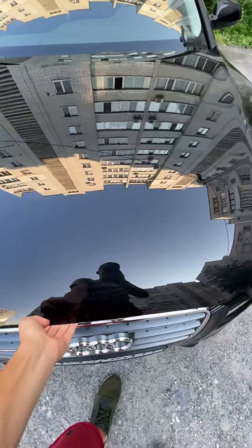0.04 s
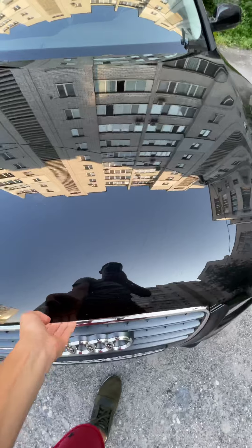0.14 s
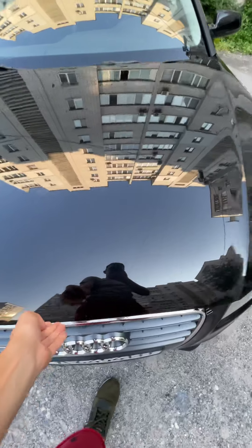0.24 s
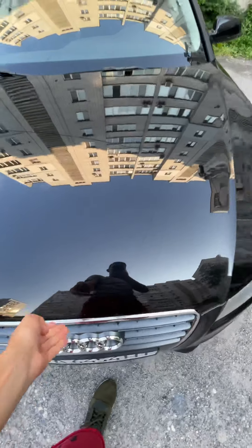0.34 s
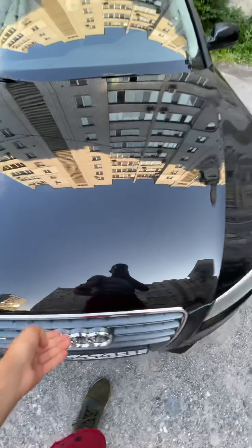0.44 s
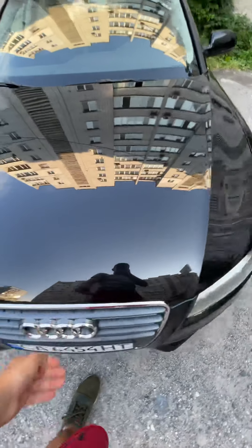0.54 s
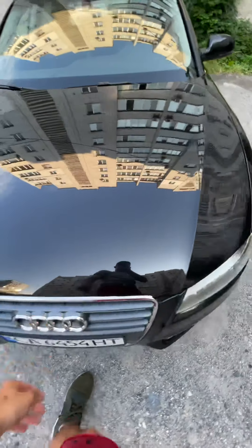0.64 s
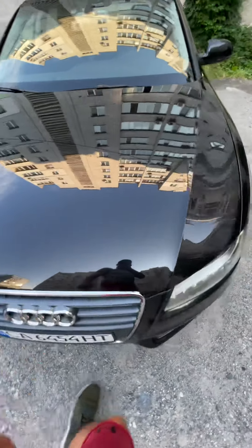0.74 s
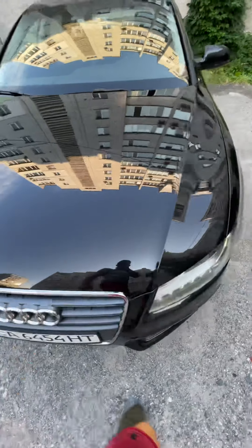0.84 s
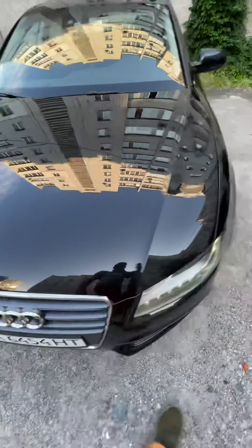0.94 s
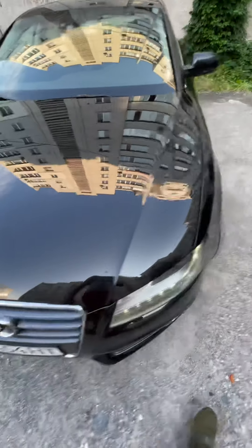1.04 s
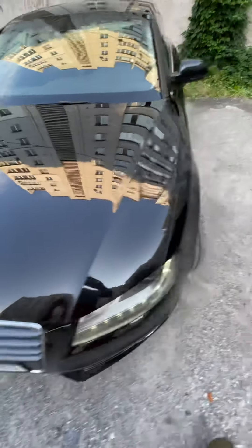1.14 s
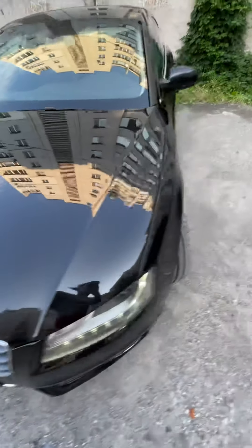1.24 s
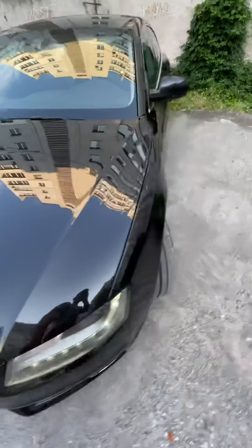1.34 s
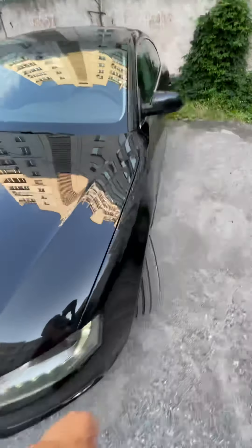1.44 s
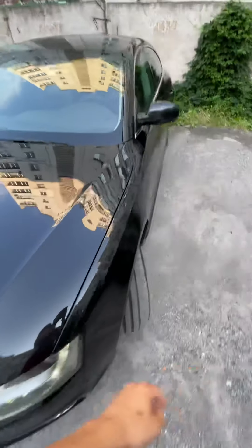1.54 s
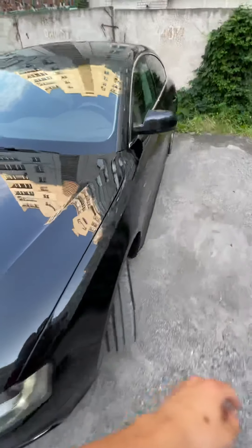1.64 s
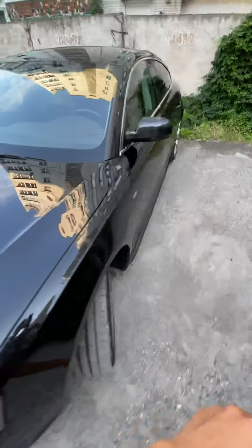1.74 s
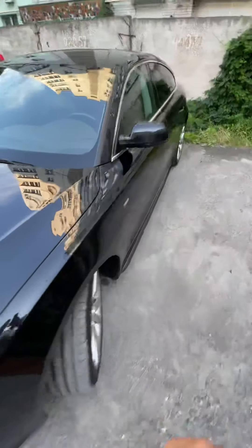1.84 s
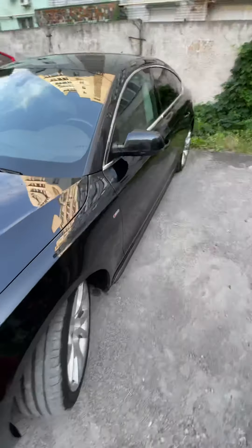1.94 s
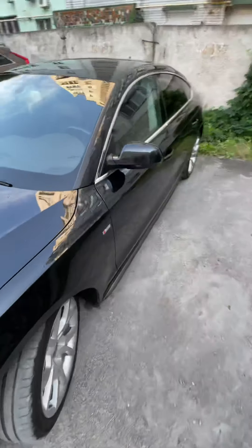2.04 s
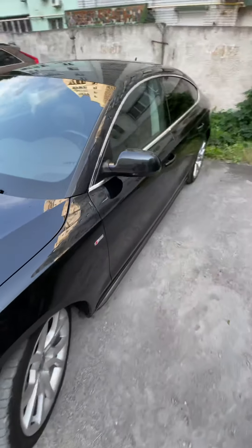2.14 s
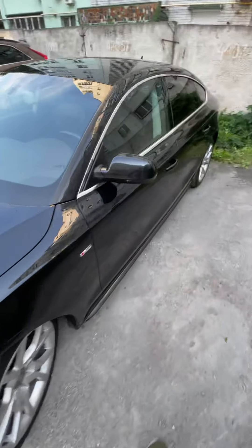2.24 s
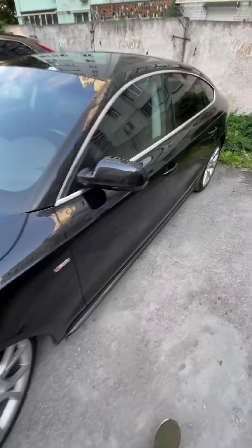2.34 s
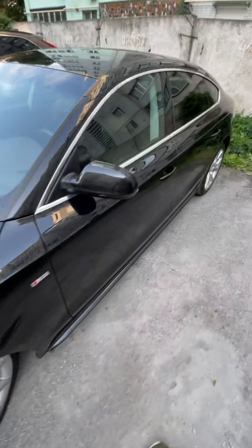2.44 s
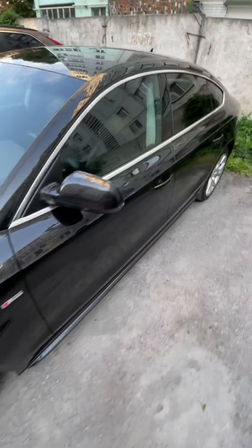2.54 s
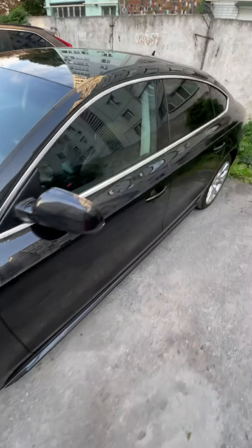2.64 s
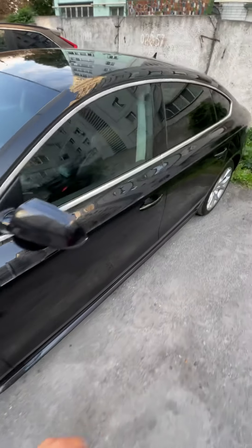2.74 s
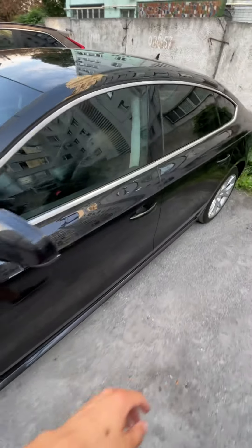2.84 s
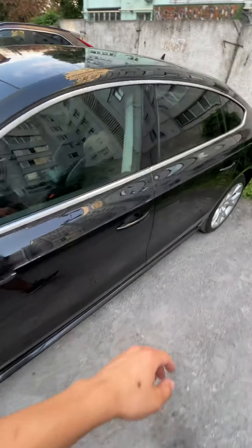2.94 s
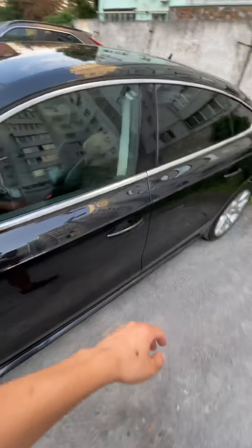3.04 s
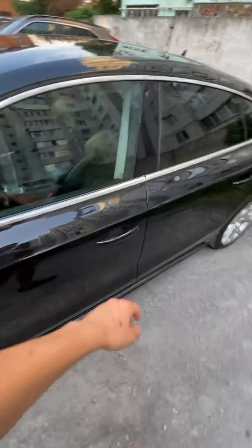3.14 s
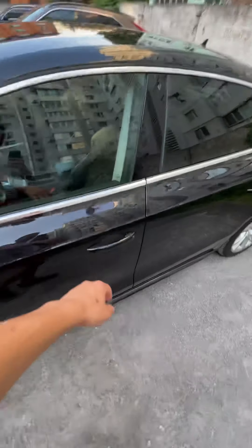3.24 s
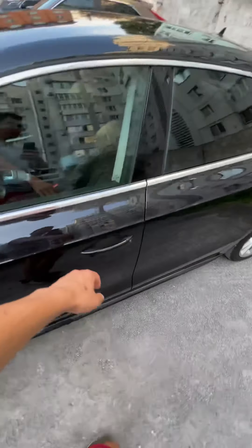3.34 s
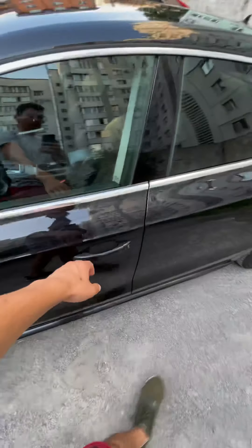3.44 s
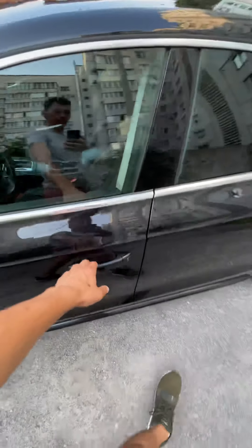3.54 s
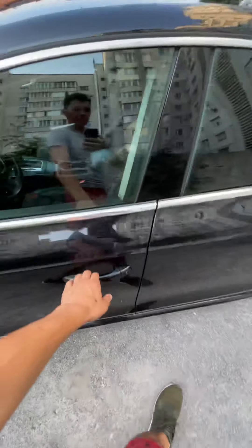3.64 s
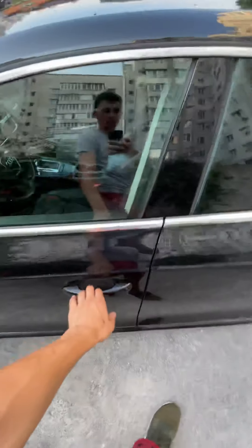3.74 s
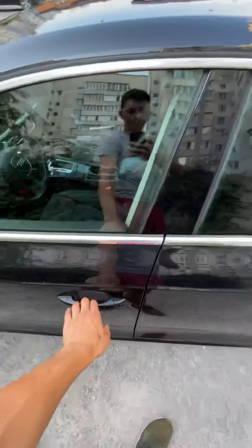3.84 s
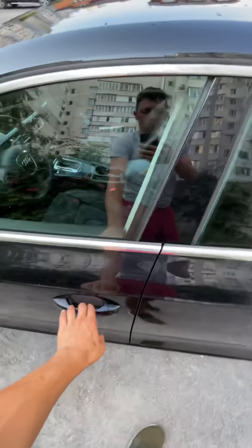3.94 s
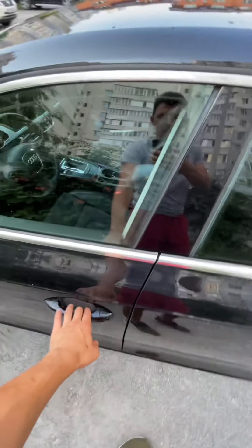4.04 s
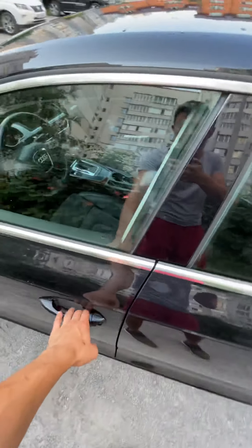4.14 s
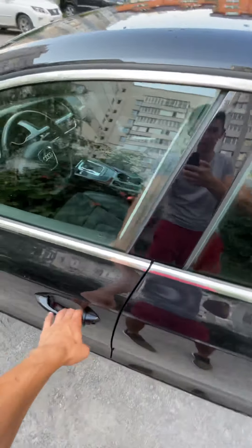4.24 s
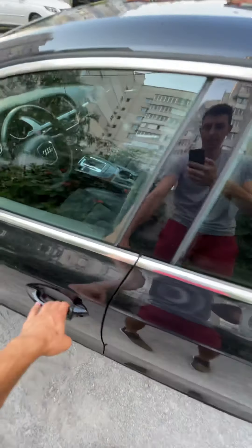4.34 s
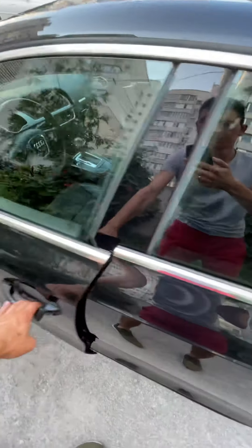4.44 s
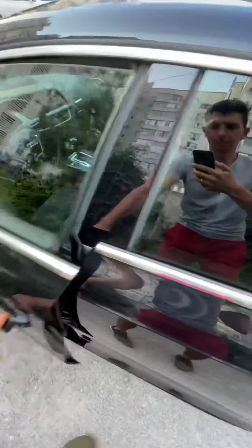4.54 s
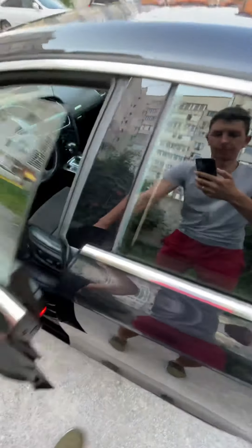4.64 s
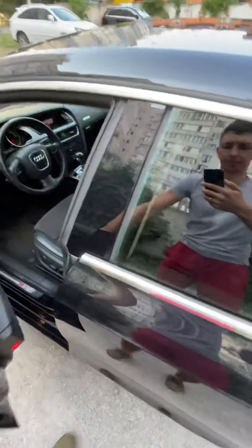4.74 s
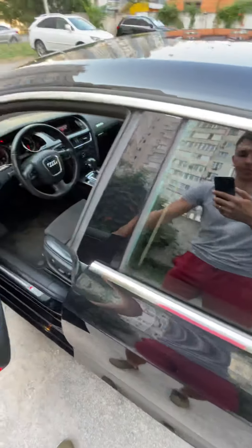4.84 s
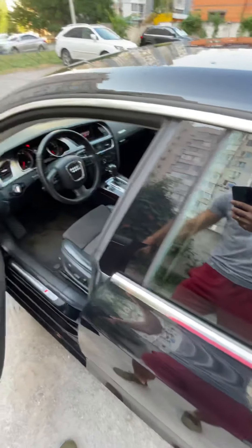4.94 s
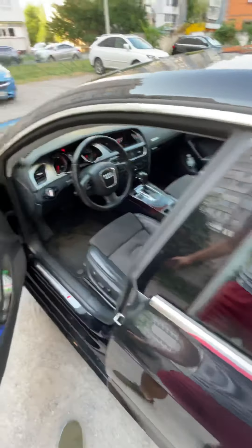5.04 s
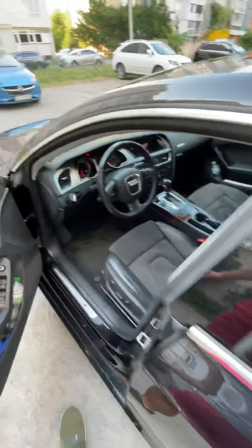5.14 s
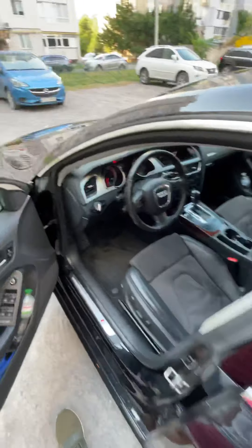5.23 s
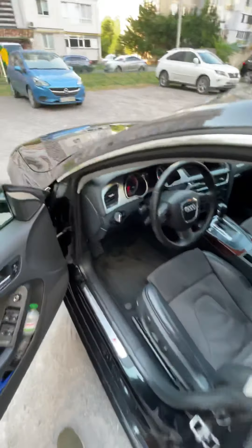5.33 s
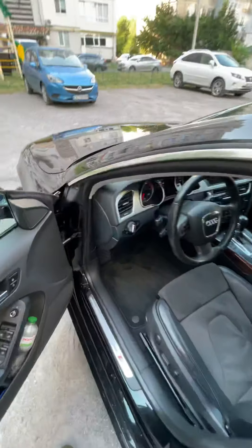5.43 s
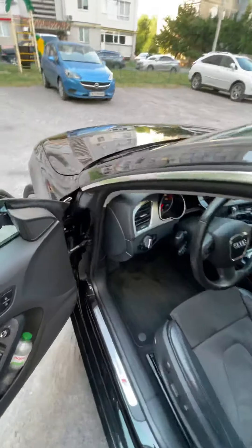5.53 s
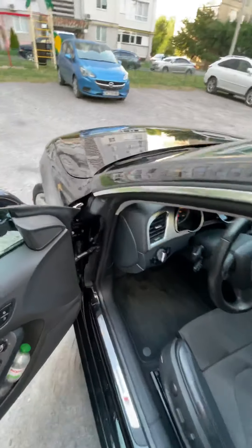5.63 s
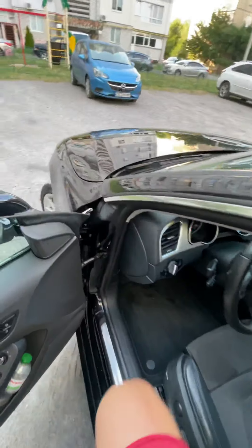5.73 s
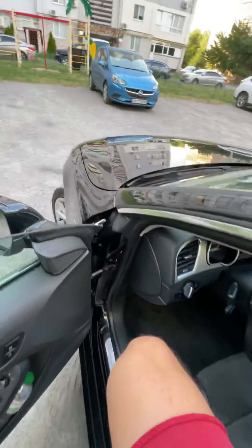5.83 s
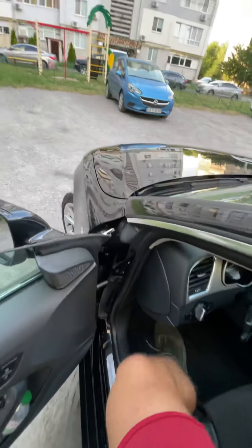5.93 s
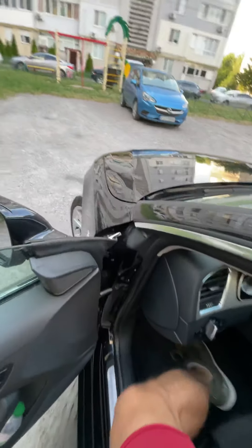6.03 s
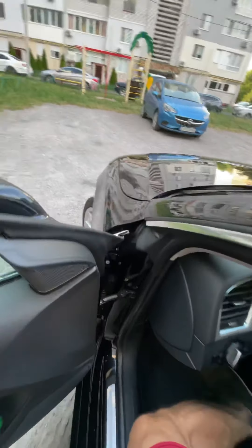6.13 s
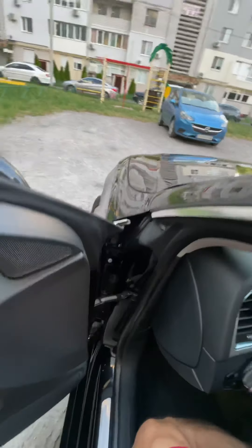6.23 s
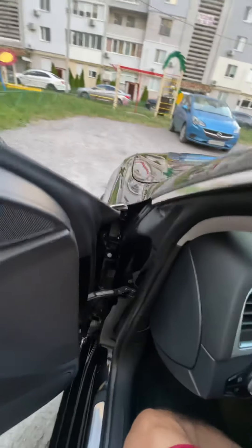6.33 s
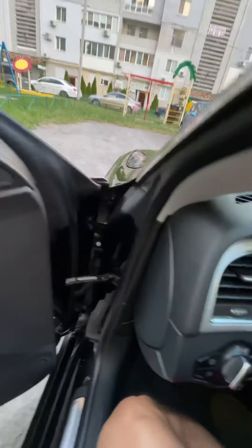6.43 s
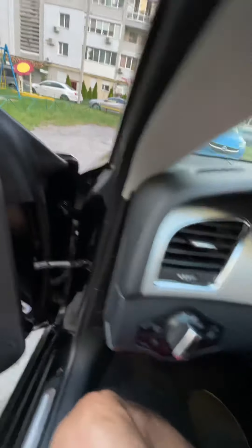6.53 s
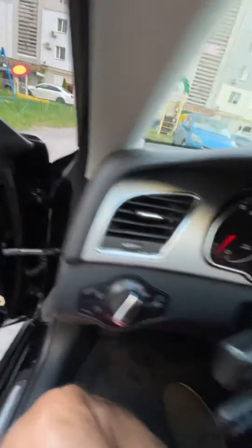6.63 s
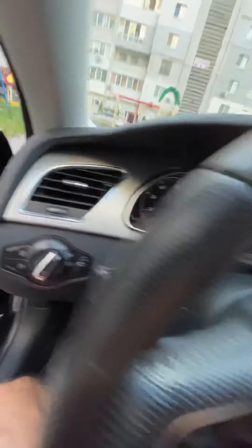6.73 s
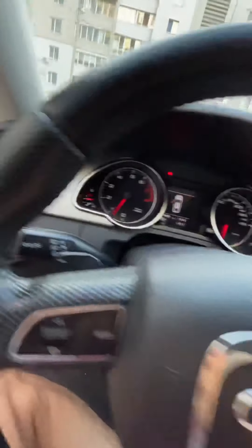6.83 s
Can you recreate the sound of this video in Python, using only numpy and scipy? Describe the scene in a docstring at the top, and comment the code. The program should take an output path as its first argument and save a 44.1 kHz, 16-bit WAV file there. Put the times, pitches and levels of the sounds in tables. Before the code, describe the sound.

A heavy bonnet slam, hard clank then deep thump, opens the scene over a throbbing engine idle. Gritty steps and low heel thuds move round the car. Fingers scrape a handle, a latch pops, the door swings to a sharp snap, and scuffs and small knocks accompany getting in. The handheld stereo microphone moves with the person; the yard adds only a short, dull tail.

```python
"""A four-cylinder engine idles in a gravel yard and a bonnet drops shut over it. Feet crunch round to the door;
the handle is pulled, the door swings to its stop and the listener climbs in, holding a two-port microphone.
Engine: firing-order sines, throbbing noise and narrow whines. Bonnet and door: decaying modes plus rattle.
Feet, hands and cloth: sagging low sines, pitched ticks and clumped ringing grains. Breeze: low noise."""
import sys
import numpy as np
from scipy import signal
from scipy.fft import rfft, irfft
from scipy.io import wavfile
from scipy.ndimage import uniform_filter1d

SR = 44100
rng = np.random.default_rng(int(sys.argv[2]) if len(sys.argv) > 2 else 0)


def put_to_file(sound):
    """Save the sound as 16-bit audio at rate SR, in the file named by the first command-line argument."""
    columns = np.atleast_2d(sound).T  # one column per channel
    safe = np.clip(columns, -1, 1)
    whole_steps = np.round(safe * 32767)
    wavfile.write(sys.argv[1], SR, whole_steps.astype(np.int16))


N = 303301

# Spectrum of gravel grit. Each row: frequency in Hz, relative level in dB per Hz.
GRIT_SPECTRUM = [(1000, -11), (2400, 2.5), (5500, -4), (8000, -14), (16000, -33)]


def gain_of(db):
    """Amplitude ratio of a level in dB."""
    return 10 ** (np.asarray(db) / 20)


def evened(x):
    """x scaled to rms 1."""
    return x / np.sqrt(np.mean(x ** 2) + 1e-20)


def read(points, hz):
    """A curve over frequency, read on a nearly logarithmic axis."""
    f, value = np.transpose(points)
    return np.interp(np.log(hz + 30), np.log(f + 30), value)


def walk(points):
    """A curve over time, read at every sample."""
    return np.interp(np.arange(N) / SR, *np.transpose(points))


def add(mix, s, sound):
    """Adds sound to mix from s seconds on, cut at the end of mix."""
    part = mix[round(s * SR):][:len(sound)]
    part += sound[:len(part)]


def coloured(x, spectrum):
    """x filtered by the spectrum, at rms 1."""
    gain = gain_of(read(spectrum, np.fft.rfftfreq(len(x), 1 / SR)))
    return evened(irfft(rfft(x) * gain, len(x)))


def drift(top_hz):
    """Slow random wander of rms 1: sines up to top_hz, stronger when slower."""
    t = np.arange(N // 100 + 2) * 100 / SR
    slow = sum(np.sin(2 * np.pi * (f * t + rng.random())) / np.sqrt(f)
               for f in np.geomspace(top_hz / 20, top_hz, 20))
    return np.interp(np.arange(N) / SR, t, evened(slow))


def resonate(x, hz, width_hz):
    """One-pole resonance of gain 1 at hz: shift down to 0 Hz, low-pass, shift back."""
    turn = np.exp(2j * np.pi * hz * np.arange(len(x)) / SR)
    r = np.exp(-np.pi * width_hz / SR)
    return 2 * (turn * signal.lfilter([1 - r], [1, -r], x / turn)).real


def patchy(x, db):
    """Parts of the spectrum swell and sink on their own as reflections shift."""
    z = signal.stft(x, nperseg=512)[2]
    field = uniform_filter1d(rng.standard_normal(z.shape), size=3, axis=0)  # over frequency
    field = uniform_filter1d(field, size=20, axis=1)  # over time
    return evened(signal.istft(z * gain_of(db * evened(field)), nperseg=512)[1][:N])


def engine(turns):
    """Firing orders hum; exhaust noise and valve clatter throb with each firing; the whines are steady bands."""
    # Harmonics of the firing rate. Each row: multiple, relative level in dB.
    orders = [(2, -9), (3, 1), (5, -8.5), (9, -19.5), (10, -15.5)]
    # Exhaust and intake noise. Each row: frequency in Hz, relative level in dB per Hz.
    rumble_spectrum = [(20, -12.5), (54, -3), (124, 0.5), (306, -6.5), (940, -18.5), (1600, -42),
                       (3000, -63)]
    # Valves, belts and injectors. Each row: frequency in Hz, relative level in dB per Hz.
    clatter_spectrum = [(600, 2.5), (1400, -2), (1800, -1), (2400, -7.5), (5000, -9), (7000, -12.5),
                        (11000, -31), (16000, -34)]
    # Fan or alternator, at one metre. Each row: frequency in Hz, width in Hz, level in dB.
    whines = [(306.7, 17.7, -50), (612, 14, -60.5), (944, 31, -60)]
    # Way round the car. Each row: time in seconds, distance from the engine bay in metres.
    distance = [(0, 1.05), (1.1, 1.15), (2.2, 1.8), (4.1, 2.87), (5.2, 3.2), (6.3, 2.8), (6.88, 1.6)]
    # Hum swelling and sinking from place to place. Each row: time in seconds, level in dB.
    hum_level = [(0, -58), (.8, -43), (1.25, -45.5), (1.55, -61), (1.97, -45), (2.3, -45), (2.6, -51.5),
                 (3.4, -47), (4.16, -41.5), (5.3, -45.5), (5.9, -52), (6.3, -44.5), (6.88, -41.5)]
    clatter_db, rumble_db = -42, -43.5  # at one metre
    bass_share = 0.15  # bass fills the yard: rumble and whine follow this share of the distance law
    open_db, shut_s = 7, 0.64  # more rumble while the bonnet is up and still shuddering

    hum = sum(gain_of(db + 1.5 * drift(8)) * np.sqrt(2) * np.cos(2 * np.pi * (k * turns + rng.random()))
              for k, db in orders)
    throb = np.exp(-(turns % 1) / 0.37)  # decays over each firing
    rumble = coloured(rng.standard_normal(N) * (1 + 0.18 * throb), rumble_spectrum)
    rumble = rumble * gain_of(0.59 * drift(10))
    clatter = coloured(rng.standard_normal(N) * (1 + 0.53 * throb), clatter_spectrum)
    clatter = patchy(clatter, db=3.0)
    whine = sum(gain_of(db) * evened(resonate(rng.standard_normal(N), hz, width_hz))
                for hz, width_hz, db in whines)

    far_db = -20 * np.log10(walk(distance))
    bass_far_db = bass_share * far_db
    lid_db = open_db * (np.arange(N) / SR < shut_s)
    out = gain_of(walk(hum_level)) * hum
    out += gain_of(rumble_db + bass_far_db + lid_db) * rumble
    out += gain_of(clatter_db + far_db) * clatter
    return out + gain_of(bass_far_db) * whine


def breeze():
    """Air past the ports: lumpy low turbulence, unrelated at the two and equally strong everywhere."""
    # Turbulence. Each row: frequency in Hz, relative level in dB per Hz.
    air_spectrum = [(15, -28), (40, 12), (200, -7.5), (500, -80)]
    ports = [coloured(rng.standard_normal(N), air_spectrum) * gain_of(5 * drift(8)) for _ in "LR"]
    return np.array(ports) * gain_of(-52.5)


def panel(modes, blows, octaves, loose_db):
    """Each blow rings the modes near its pitch and shakes loose parts, whose treble dies first."""
    # Loose metal. Each row: frequency in Hz, relative level in dB per Hz.
    rattle_spectrum = [(150, -2.5), (500, 3.5), (2200, -5), (4500, -10), (8000, -7.5), (16000, -39.5)]
    # Decay of loose metal. Each row: frequency in Hz, t60 in seconds.
    rattle_t60 = [(200, 0.6), (1000, 0.13), (6000, 0.081)]
    shake_db = 0.75  # loss per squared octave from the blow's pitch
    ragged_db = 3.5  # unevenness of the chatter
    out, t = np.zeros(N), np.arange(2 ** 14) / SR
    bins_hz = np.fft.rfftfreq(len(t), 1 / SR)
    for s, db, best_hz in blows:
        ring = np.zeros(len(t))
        for k, (hz, level_db, t60_s) in enumerate(modes):
            off_tune = np.log2(hz / best_hz) / octaves
            mode_gain = gain_of(level_db - 5.6 * off_tune ** 2 - 60 * t / t60_s)
            blow_hz = hz * (1 + 0.016 * rng.standard_normal())  # shifts a little from blow to blow
            ring += (-1) ** k * mode_gain * np.sin(2 * np.pi * blow_hz * t)  # neighbours start opposed
        build_up = 1 - np.exp(-t * best_hz / 0.34)  # slower for a softer, lower blow
        add(out, s, gain_of(db) * ring * build_up)

        chatter = gain_of(ragged_db * evened(uniform_filter1d(rng.standard_normal(len(t)), size=90)))
        shake = rfft(coloured(chatter * rng.standard_normal(len(t)), rattle_spectrum))
        for low_hz in 100 * 2. ** np.arange(8):  # octave bands
            band = irfft(shake * ((bins_hz >= low_hz) & (bins_hz < 2 * low_hz)), len(t))
            rattle_db = db + loose_db - shake_db * np.log2(2 * low_hz / best_hz) ** 2
            add(out, s, gain_of(rattle_db - 60 * t / read(rattle_t60, 2.84 * low_hz)) * band)
    return out


def bonnet():
    """Sheet metal struck by latch, rubber stops, the body sinking on its springs and the catch chattering."""
    # Modes. Each row: frequency in Hz, relative level in dB, t60 in seconds.
    modes = [(65, -4.5, 0.31), (83.5, 4.5, 0.096), (117.2, -10.5, 0.39), (155.3, -8, 0.22),
             (278, 3.5, 0.046), (331, -1.5, 0.13), (359, 1, 0.1), (446.6, -8.5, 0.14), (588, -10, 0.11),
             (760, -12.5, 0.17), (1083, -9, 0.065), (1400, -16, 0.07), (2100, -6, 0.058),
             (2700, -25, 0.029), (3615, -11, 0.029), (4330, -10, 0.034), (5140, -18, 0.039)]
    # Blows. Each row: start in seconds, level in dB, frequency driven best in Hz.
    blows = [(0.263, -7, 1050), (0.2648, -9.5, 3840), (.272, -12.5, 616), (.297, -7.5, 360),
             (0.296, -14.5, 120), (.3, -11, 2100), (0.313, -8, 4040), (.318, -3.5, 397), (.324, -15, 2500),
             (0.328, -1, 78.5), (0.386, -18.5, 107), (0.477, -22.5, 112), (.505, -22, 90),
             (.419, -32, 4000)]
    return panel(modes, blows, octaves=0.88, loose_db=-5)


def thuds():
    """Heels on the ground, weight on sill and seat: a few low cycles that sag in pitch."""
    # Soft landings. Each row: start in seconds, level in dB, time scale in seconds.
    landings = [(0.683, -25.5, 0.02), (1.213, -31.5, 0.034), (1.293, -31.5, 0.034), (1.846, -28.5, 0.021),
                (2.349, -26.5, 0.025), (5.36, -31.5, 0.019), (6.296, -31.5, 0.018), (6.822, -27.5, 0.019)]
    final_hz = 60.7
    out = np.zeros(N)
    for s, db, length_s in landings:
        u = np.arange(0, 3, 1 / (SR * max(length_s, .01)))  # time in units of the time scale
        shape = np.e * 4.7 * u * np.exp(-3.0 * u)
        sagging_hz = final_hz * (1 + 0.42 * np.exp(-u / 0.21))
        add(out, s, gain_of(db) * shape * np.sin(2 * np.pi * np.cumsum(sagging_hz) / SR))
    return out


def ticks():
    """Single stones, snaps and knocks: a short burst with a pitch, over a duller knock."""
    # Ticks. Each row: start in seconds, level in dB, pitch in Hz, t60 in seconds.
    snaps = [(1.0039, -37, 1400, 0.074), (1.1843, -35, 1580, 0.035), (1.2665, -34, 3770, 0.071),
             (1.4092, -36.5, 2560, 0.025), (1.7684, -37, 3960, 0.021), (1.8554, -33, 3200, 0.03),
             (1.912, -36.5, 2940, 0.039), (3.4353, -33, 2270, 0.05), (4.1867, -33, 2730, 0.062),
             (4.2219, -28.5, 2310, 0.06), (4.367, -38, 3850, 0.038), (4.4767, -33.5, 2280, 0.081),
             (4.6398, -42, 1710, 0.031), (4.8697, -24, 4300, 0.031), (5.322, -32.5, 3450, 0.017),
             (5.3757, -34.5, 5020, 0.038), (5.917, -37, 1486, 0.028), (5.987, -30.5, 1400, 0.024),
             (6.4683, -37.5, 2680, 0.026), (6.642, -28, 2010, 0.017), (6.6982, -36, 3043, 0.012)]
    # Knock under a tick. Each row: frequency in Hz, relative level in dB per Hz.
    knock_spectrum = [(150, 1), (400, 18.5), (750, 14.5), (2400, -16)]
    knock_db, knock_db_per_octave = -2, 14.5  # against a 2500 Hz snap; stronger under lower ones
    out, t = np.zeros(N), np.arange(2000) / SR
    rise = 1 - np.exp(-t / 0.00049)
    for (s, db, hz, t60_s), noise in zip(snaps, rng.standard_normal((len(snaps), 2, len(t)))):
        # the shorter, the noisier
        snap = np.sin(2 * np.pi * hz * t) + 0.023 / t60_s * coloured(noise[0], GRIT_SPECTRUM)
        knock_gain = gain_of(knock_db + knock_db_per_octave * np.log2(2500 / hz))
        knock = knock_gain * coloured(noise[1], knock_spectrum)
        add(out, s, gain_of(db - 60 * t / t60_s) * rise * (snap + knock))
    return out


def grains(per_s, lo_hz, hi_hz, cycles):
    """Clumped clicks of uneven size, each ringing a few cycles at one of many pitches."""
    clumps = gain_of(2.0 * evened(uniform_filter1d(rng.standard_normal(N), size=350)))
    sizes = gain_of(1.6 * np.minimum(rng.exponential(1, N), 4)) * rng.standard_normal(N)
    clicks = clumps * sizes * (rng.random(N) < per_s / SR)
    pitches_hz = np.geomspace(lo_hz, hi_hz, num=16)
    which = rng.integers(0, len(pitches_hz), N)
    return sum(resonate(clicks * (which == k), hz, hz / cycles) for k, hz in enumerate(pitches_hz))


def scuffs():
    """Soles, fingers, door seal and cloth: grit and a duller scrape follow the pressure of each stroke."""
    # Grit crunching under soles. Each row: start in seconds, length in seconds, grit level in dB.
    steps = [(1.176, 0.18, -45.5), (1.825, 0.14, -46.5), (2.134, 0.74, -50.5), (2.966, 0.17, -46.5),
             (3.504, 0.27, -49)]
    # Fingers on the handle, the door seal peeling, cloth and shoe on sill and seat.
    # Each row: start, peak and end in seconds, grit level in dB, scrape level in dB, scrape pitch in Hz.
    # A row whose end precedes its start is silent.
    rubs = [(4.113, 4.184, 4.17, -43, -42.5, 900), (4.208, 4.24, 4.33, -37, -36.5, 690),
            (4.285, 4.413, 4.6, -51.5, -53, 1210), (4.46, 4.554, 4.605, -40, -41.5, 800),
            (4.5, 4.648, 4.82, -46, -39, 1180), (4.845, 4.862, 4.78, -44, -42, 1050),
            (5.235, 5.335, 5.41, -45, -54.5, 1470), (5.398, 5.42, 5.485, -38, -48, 2200),
            (5.805, 5.926, 5.95, -37.5, -34.5, 600), (5.936, 5.963, 6.03, -36, -31.5, 735)]
    step_rise, step_scrape_db, step_hz = 0.14, -2.5, 900  # share of length; against grit; scrape pitch
    grit = patchy(coloured(grains(7000, 1000, 13700, cycles=6), GRIT_SPECTRUM), db=2.5)
    dull = grains(1800, 293, 2870, cycles=3)
    out = np.zeros(N)
    strokes = [(s, s + step_rise * length_s, s + length_s, db, db + step_scrape_db, step_hz)
               for s, length_s, db in steps]
    for start, top, end, grit_db, scrape_db, hz in strokes + rubs:
        at = np.arange(round(start * SR), min(round(end * SR), N))
        pressure = np.interp(at / SR, [start, top, end], [0, 1, 0]) ** 0.72
        scrape = resonate(resonate(dull[at], hz, 1.13 * hz), hz, 1.13 * hz)
        stroke = gain_of(grit_db) * evened(grit[at]) + gain_of(scrape_db) * evened(scrape)
        out[at] += pressure * stroke
    return out


def door():
    """Door metal struck by latch release, handle springing back, door stop and knocks on the sill."""
    # Modes. Each row: frequency in Hz, relative level in dB, t60 in seconds.
    modes = [(57.6, 0, 0.29), (90, 1.5, 0.15), (130, 1, 0.14), (235, -1, 0.054), (372.6, 0.5, 0.093),
             (489, -1, 0.049), (612, -9, 0.044), (900, -16.5, 0.11)]
    # Blows. Each row: start in seconds, level in dB, frequency driven best in Hz.
    blows = [(4.381, -15.5, 235), (4.39, -13.5, 360), (4.403, -19, 130), (4.424, -22, 81),
             (4.496, -22.5, 313), (4.508, -22, 540), (4.558, -24, 760), (4.615, -31.5, 556),
             (4.873, -16.5, 735), (4.885, -20.5, 251), (4.902, -26.5, 114), (4.936, -31, 120),
             (5.961, -19, 770), (6.547, -32.5, 236), (6.776, -30, 520), (6.788, -24.5, 117),
             (6.837, -35, 420), (6.864, -31.5, 550)]
    return panel(modes, blows, octaves=0.59, loose_db=-10)


def yard(x):
    """Walls and car sides return a short, dull tail of sparse taps."""
    t = np.arange(SR // 2) / SR
    sparse = rng.choice([-1., 1.], len(t)) * (rng.random(len(t)) < 2000 / SR)
    taps = sparse * gain_of(-60 * t / 0.17) * (t > .008)
    taps = signal.lfilter([1], [1, -.7], taps)  # dulls
    return signal.oaconvolve(x, taps / np.linalg.norm(taps))[:N]


def sources(turns):
    """Everything around the car, along one path; only the hits and scuffs get the yard's tail."""
    hits = bonnet() + door() + ticks() + scuffs()
    return hits + gain_of(-15.0) * yard(hits) + thuds() + engine(turns)


def scene():
    """The right port shares part of the left's sound; the rest arrives along another, scattered path."""
    # Likeness of the ports. Each row: frequency in Hz, likeness from 0 to 1.
    likeness = [(60, 0.98), (300, 0.99), (700, 0.76), (2000, 0.61), (6800, 0.99)]
    firing_hz = 23.36  # mean at idle
    turns = np.cumsum(firing_hz * (1 + 0.0047 * drift(2.5))) / SR  # in firings
    direct, scattered = sources(turns), sources(turns)
    same = np.clip(read(likeness, np.fft.rfftfreq(N, 1 / SR)), 0, 1)
    right = irfft(same * rfft(direct) - 1j * np.sqrt(1 - same ** 2) * rfft(scattered), N)
    return np.array([direct, right]) + breeze()


def record(dry):
    """The right port lags the left; loud peaks are rounded; then the band limit."""
    # Lag of the right port. Each row: frequency in Hz, phase in radians.
    lag = [(0, 0), (1400, .2), (2000, 1.0), (4500, 1.4), (7600, 3.14), (14500, 9.42)]
    # Balance of the ports. Each row: frequency in Hz, left minus right in dB.
    balance = [(60, 0.5), (250, 0), (600, 4), (1500, 0)]
    edge_hz, ceiling = 15900, 1.05
    hz = np.fft.rfftfreq(N, 1 / SR)
    # each port takes half of the lag and balance
    half = gain_of(read(balance, hz) / 2) * np.exp(.5j * np.interp(hz, *np.transpose(lag)))
    ports = irfft(rfft(dry) * np.array([half, 1 / half]), N)
    rounded = ceiling * np.tanh(ports / ceiling)
    low_pass = signal.firwin(511, edge_hz, window=("kaiser", 9), fs=SR)
    return signal.oaconvolve(rounded, low_pass[None], "same")


dry = scene()
out = record(dry)
put_to_file(out)
```